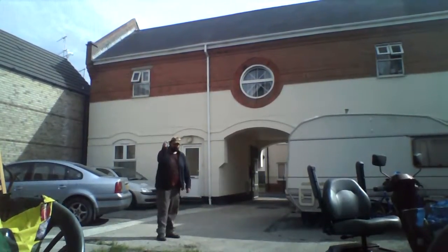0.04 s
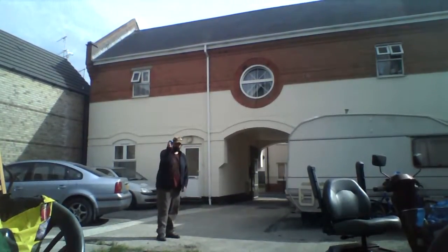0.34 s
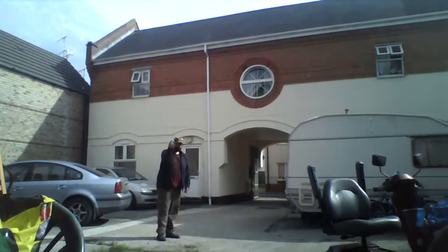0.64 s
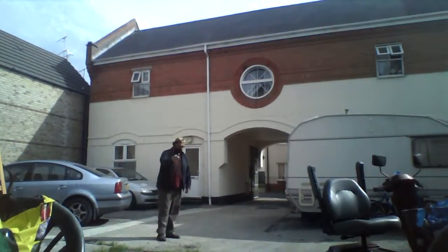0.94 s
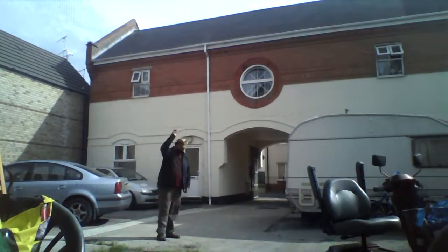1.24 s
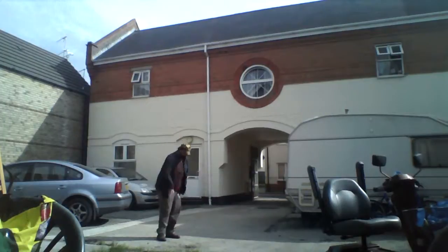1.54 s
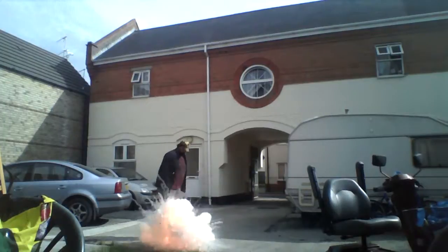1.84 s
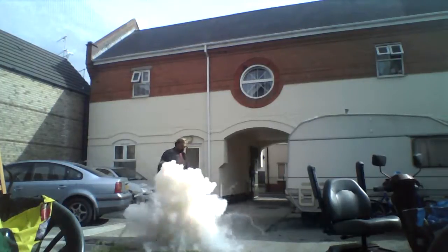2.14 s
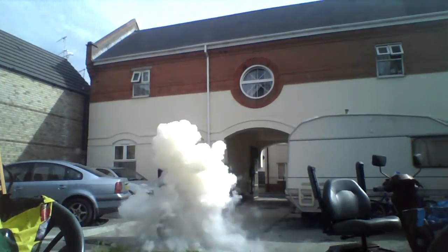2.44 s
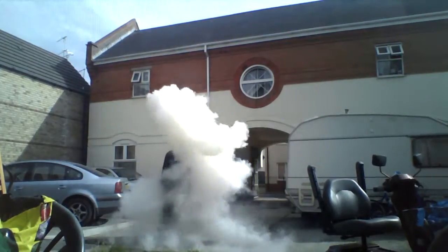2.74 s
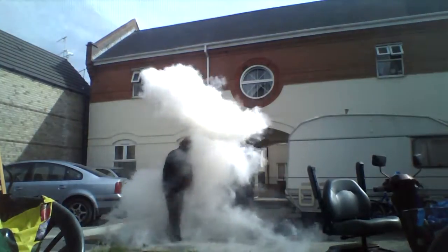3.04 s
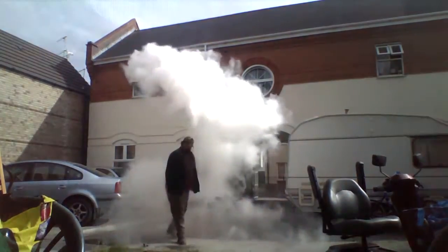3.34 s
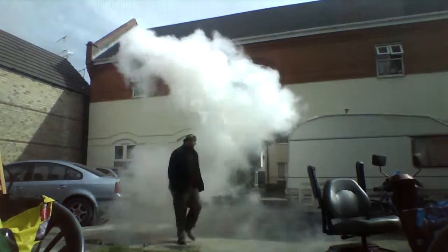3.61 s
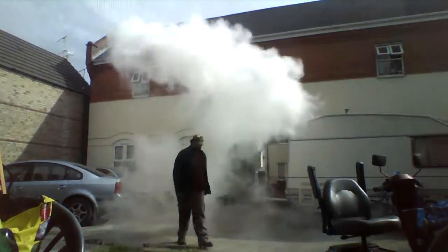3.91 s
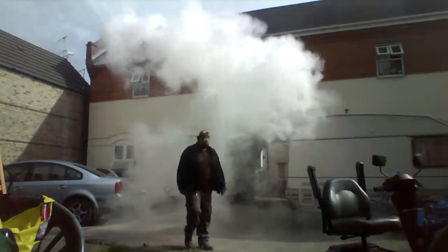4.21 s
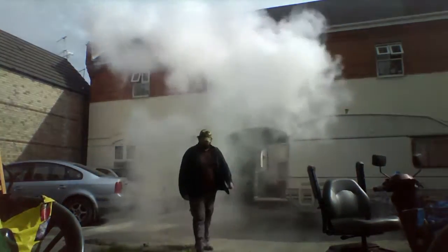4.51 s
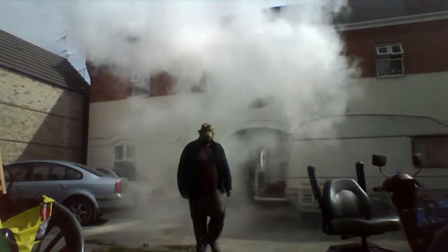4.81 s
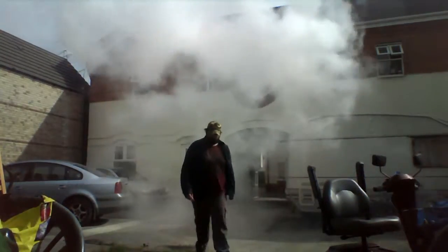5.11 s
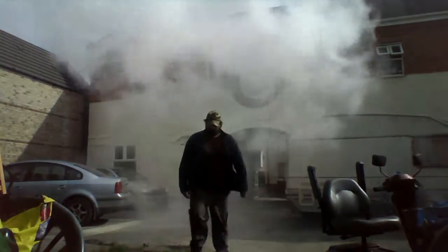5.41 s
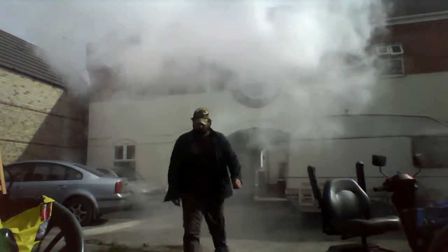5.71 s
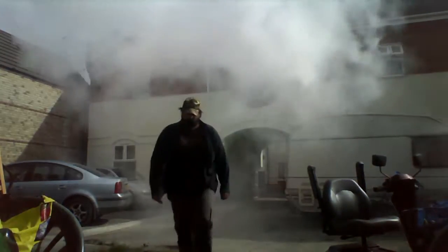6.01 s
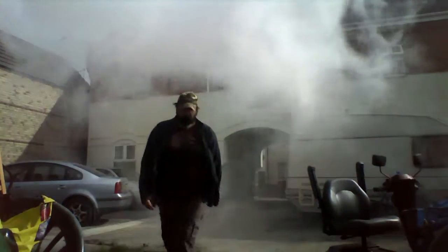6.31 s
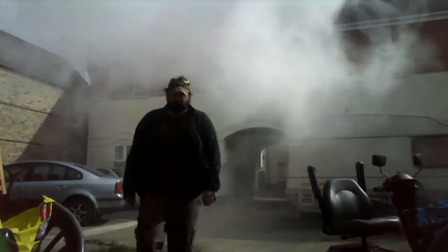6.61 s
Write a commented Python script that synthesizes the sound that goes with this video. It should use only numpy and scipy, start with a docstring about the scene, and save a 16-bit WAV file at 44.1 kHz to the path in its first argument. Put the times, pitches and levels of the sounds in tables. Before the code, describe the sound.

In a walled courtyard with faint distant traffic, a few quick ticks and a very short fizz lead into the sharp, slightly distorted bang of a smoke bomb. A loud, sizzling rush of gas follows and sputters out in under a second. Then a low thump of wind hits the small mono microphone nearby. Lighter puffs of air come later, and a shoe scuffs quietly once near the end.

```python
"""A smoke bomb, thrown down in a walled courtyard a few metres from a small mono camera.
It ticks on the paving, fizzes alight and bursts; the bang overloads the microphone and rings
between the walls. Gas from the burning powder rushes out with a hiss, a roar and a last rasp.
A puff of air then thumps on the microphone; lighter gusts touch it before and later.
A shoe scuffs once, over a faint town hum."""
import sys
import numpy as np
from scipy import signal
from scipy.fft import rfft, irfft, next_fast_len
from scipy.io import wavfile
from scipy.ndimage import uniform_filter1d, map_coordinates

SR = 44100
rng = np.random.default_rng(int(sys.argv[2]) if len(sys.argv) > 2 else 0)


def dump(signal):
    """Clip the signal to [-1, 1] and save it as 16-bit WAV at the path in sys.argv[1]."""
    limited = np.clip(np.atleast_2d(signal).T, -1, 1)
    pcm = np.round(limited * 32767).astype(np.int16)
    wavfile.write(sys.argv[1], SR, pcm)


N = 297675
BANG_S = 1.7494

# echoes off ground, cars and walls: delay/s, level/dB
REFLECTIONS = [(.0057, -9.5), (.0108, -21), (.0154, -11.5), (.0185, -13.5), (0.022, -9.5), (.0808, -15),
               (.1215, -18), (.135, -13), (.222, -22)]


def amp(db):
    """Decibels to gain."""
    return 10 ** (np.asarray(db) / 20)


def unit(x):
    """Scale to rms 1."""
    return x / np.sqrt(np.mean(x ** 2) + 1e-20)


def along(points, hz):
    """Interpolate (f/Hz, value) points over log frequency."""
    f, v = np.transpose(points)
    return np.interp(np.log(hz + 1), np.log(f + 1), v)


def clock():
    """Sample times in s."""
    return np.arange(N) / SR


def fade(start_s, end_s):
    """Ramp from 0 at start_s to 1 at end_s."""
    return np.clip((clock() - start_s) / (end_s - start_s), 0, 1)


def peaked(peak_s, rise_db_s, fall_db_s):
    """Level in dB: climbs to 0 at peak_s, then falls; slopes in dB/s."""
    t = clock()
    return np.minimum(rise_db_s * (t - peak_s), fall_db_s * (peak_s - t))


def wobble(rate_hz):
    """Smooth random curve, rate_hz knots a second."""
    return map_coordinates(rng.standard_normal(int(N * rate_hz / SR) + 4), [clock() * rate_hz])


def filtered(x, response):
    """Apply the frequency response response(hz)."""
    size = next_fast_len(N + SR // 2)
    return irfft(rfft(x, size) * response(np.fft.rfftfreq(size, 1 / SR)), size)[:N]


def coloured(x, spectrum):
    """Shape x by a (f/Hz, level/dB) spectrum; rms 1."""
    return unit(filtered(x, lambda hz: amp(along(spectrum, hz))))


def noise(spectrum):
    """Coloured Gaussian noise, rms 1."""
    return coloured(rng.standard_normal(N), spectrum)


def pulse(spectrum, size=2048):
    """Minimum-phase pulse with this spectrum, peak 1."""
    cepstrum = irfft(np.log(amp(along(spectrum, np.fft.rfftfreq(size, 1 / SR)))))
    cepstrum[1:size // 2] *= 2
    cepstrum[size // 2 + 1:] = 0
    shape = irfft(np.exp(rfft(cepstrum)))
    return shape / np.abs(shape).max()


def town():
    """Distant traffic and the wavering hum of a far engine drawing near."""
    # traffic noise spectrum: f/Hz, level/dB
    traffic_spectrum = [(50, -24), (97, -29.5), (125, -3.5), (175, -2.5), (245, -5.5), (370, -6.5),
                        (500, -8.5), (720, -9), (1220, -13.5), (1950, -17), (3000, -22.5), (7500, -27)]
    # engine orders: f/Hz, level/dB
    orders = [(181, 0), (314, -6.5), (375, -15), (680, -11.5), (775, -8.5), (860, -13)]
    hum = 0
    for hz, db in orders:
        gain = amp(db + 2.4 * wobble(5.6))
        wavering_hz = hz * (1 + .012 * wobble(13))
        hum += gain * np.sin(2 * np.pi * np.cumsum(wavering_hz) / SR)
    traffic_db = -59 + 0.02 * clock() + 0.17 * wobble(4.9)
    return amp(traffic_db) * noise(traffic_spectrum) + amp(-82.5 + 3 * clock()) * hum


def scuff():
    """A shoe grinds briefly on gritty paving."""
    # grit spectrum: f/Hz, level/dB
    grit = [(1000, -12), (2200, -7), (2600, -7), (3100, -2), (3700, -8), (4200, -17), (7500, -27)]
    return amp(-58 + peaked(5.738, rise_db_s=3000, fall_db_s=1100)) * noise(grit)


def eddy(peak_s, db, hz, half_length_s):
    """One eddy briefly swings the pressure at the microphone."""
    t = clock() - peak_s
    bell = np.exp(1 - np.sqrt(1 + 3 * (t / half_length_s) ** 2))
    return amp(db) * bell * np.cos(2 * np.pi * hz * t)


def buffets():
    """Air on the microphone: a thump, its flutter and single light puffs."""
    # eddies, the two loudest form the thump: t/s, level/dB, f/Hz, half length/s
    puffs = [(0.016, -19, 229, 0.0024), (0.031, -30.5, 180, 0.005), (0.057, -32, 175, .009),
             (.24, -52, 163, .008), (2.53, -47.5, 152, .03), (2.583, -27, 174, 0.007),
             (2.604, -32, 352, .003), (2.62, -20, 179, 0.007), (2.6362, -5, 388.4, 0.0015),
             (2.644, -4.5, 191, 0.0045), (2.654, -24, 330, .002), (2.665, -15.5, 160.1, 0.01),
             (2.697, -14, 205.3, 0.0035), (2.714, -19.5, 199, .0035), (2.733, -20.5, 160, 0.0054),
             (2.746, -26.5, 260, .003), (2.7565, -22.5, 175, 0.005), (2.773, -26.5, 135, 0.014),
             (2.806, -36, 195, 0.0055), (2.872, -34, 180, 0.0043), (2.938, -44.5, 165, .004),
             (2.953, -39, 185, 0.004), (2.968, -44, 150, .008), (3.409, -51, 168, 0.0088),
             (4.117, -54, 159, 0.0062), (4.478, -39.5, 140, 0.01), (4.577, -45.5, 142, 0.0093),
             (6.538, -44, 218, 0.0047), (6.563, -50, 133, 0.022)]
    pressure = sum(eddy(*puff) for puff in puffs)
    # finer turbulence rides on the gust
    swirl = noise([(100, -18), (170, 7), (350, 2), (550, -15), (900, -26), (2000, -70)])
    pressure += amp(-36.5) * swirl * fade(2.59, 2.64) * fade(2.79, 2.74)
    mic_low_cut = [(30, -19.5), (70, -17.5), (95, -21), (122, 1.5)]  # f/Hz, gain/dB
    return filtered(pressure, lambda hz: amp(along(mic_low_cut, hz)))


def courtyard(hz):
    """Gain of the standing waves between the walls."""
    # courtyard modes: f/Hz, width/Hz, level/dB
    modes = [(135, 34, 7.5), (213.5, 21, 8.5), (280, 49, 2), (457, 23, 6.5), (565.7, 18, 2.5),
             (706, 26, 3.5), (785, 13, -3.5), (883, 81, 2), (1020, 47, 4), (1306, 30, -0.5), (1590, 57, 0),
             (1716, 26, -2), (2040, 32, 0.5)]
    power = sum(amp(db) ** 2 / (1 + (2 * (hz - mode_hz) / width_hz) ** 2) ** 2
                for mode_hz, width_hz, db in modes)
    return np.sqrt(1 + power)


def ticks():
    """Sharp ticks as the bomb meets the paving and catches."""
    # contacts: t/s, level/dB, T60/s
    contacts = [(1.6355, -37, .02), (1.674, -38, .03), (1.683, -34, .02), (1.694, -21, .009),
                (1.703, -36, .02), (1.72, -31, .025)]
    t = clock()
    envelope = sum((t > s) * amp(db - 9 - 60 * np.abs(t - s) / t60_s) for s, db, t60_s in contacts)
    return envelope * noise([(200, -10.5), (900, 14.5), (1800, -10.5), (3200, -2),
                             (4200, -9.5), (5100, 1.5), (6100, -9), (7000, -1.5)])


def sparks(rate_hz, spread_db):
    """Burning grains: tiny pops of uneven size at random times, rms 1."""
    pops = (rng.random(N) < rate_hz / SR) * rng.standard_normal(N)
    return unit(pops * amp(spread_db * rng.standard_normal(N)))


def ignition():
    """The powder catches, fizzes louder, flares and is blown out by the bang."""
    # fizz spectrum: f/Hz, level/dB
    fizz_spectrum = [(100, -12), (300, -2.5), (850, 2.5), (2200, -9.5), (3000, -11), (4000, -7),
                     (6200, -9.5), (7500, -21)]
    flare_s, growth_db_s = 1.73, 290.5
    growth_db = growth_db_s * (BANG_S - flare_s) + peaked(BANG_S, growth_db_s, fall_db_s=1401)
    flare_db = 12 * fade(flare_s, flare_s + .008)
    fizz = coloured(rng.standard_normal(N) + .9 * sparks(rate_hz=600, spread_db=2), fizz_spectrum)
    return amp(-42.5 + growth_db + flare_db) * fizz


def rumble():
    """The billowing cloud rumbles faintly below the rush."""
    # rumble spectrum: f/Hz, level/dB
    spectrum = [(25, -10), (55, -2.5), (95, 0.5), (140, -20), (300, -59.5)]
    return amp(-61.5 + peaked(1.93, rise_db_s=129.5, fall_db_s=137.5)) * noise(spectrum)


def turbulence(x, depth_db):
    """Patches of random gain, a few hundred Hz by tens of ms; rms 1."""
    bins = signal.stft(x, nperseg=512)[2]
    patches = uniform_filter1d(rng.standard_normal(bins.shape), size=3, axis=0)
    patches = uniform_filter1d(patches, size=9, axis=1)
    return unit(signal.istft(bins * amp(depth_db * unit(patches)), nperseg=512)[1][:N])


def burn_levels():
    """Hiss, roar and rasp in dB: a first jet, then the bulk of the powder swells, sputters, is spent."""
    # last lumps of powder sputtering: t/s, level change/dB
    sputters = [(2.07, 0.5), (2.2, 1.5), (2.295, 1), (2.382, -2), (2.455, 0), (2.495, -3.5)]
    t = clock()
    jet = amp(-23.5 - 55 * np.abs(t - BANG_S))
    swell = amp(-24.5 + peaked(2.016, rise_db_s=50.5, fall_db_s=43))
    sputter_db = sum(db * np.exp(-((t - s) / 0.023) ** 2) for s, db in sputters)
    hiss_db = 20 * np.log10(np.hypot(jet, swell)) + .4 * sputter_db
    roar_db = -25.5 + peaked(1.964, rise_db_s=2, fall_db_s=45) + sputter_db
    rasp_db = -44 + peaked(2.39, rise_db_s=39, fall_db_s=28.5)
    spent_db = 9 * fade(2.483, 2.533)
    return hiss_db - spent_db, roar_db - spent_db, rasp_db - spent_db


def burn():
    """Gas rushes from the burning powder, mirrored by the ground and near walls."""
    # sizzling hiss: f/Hz, level/dB
    hiss_spectrum = [(900, -28), (1500, -13.5), (1950, -3), (2450, -2.5), (3100, -3.5), (3800, -1),
                     (4500, -4.5), (5200, -3.5), (5800, -6.5), (6700, -4), (7500, -7.5)]
    # billowing roar: f/Hz, level/dB
    roar_spectrum = [(110, -21.5), (170, -10.5), (260, -5.5), (480, -4), (560, -9), (700, -2.5), (1000, -1),
                     (1400, 1), (2000, -1.5), (2500, -8), (3300, -9), (4400, -23.5), (7000, -45)]
    # last gas rasping from the emptying case: f/Hz, level/dB
    rasp_spectrum = [(500, -18.5), (800, -8.5), (960, 6.5), (1130, -7), (1400, -1.5), (1750, -4),
                     (2100, 1.5), (2350, -13), (3500, -26), (4500, -14.5), (5000, -5.5), (5700, -9.5),
                     (7500, -11.5)]
    hiss_db, roar_db, rasp_db = burn_levels()
    sizzle = rng.standard_normal(N) + 0.5 * sparks(rate_hz=2500, spread_db=-0.5)
    hiss = turbulence(coloured(sizzle, hiss_spectrum), depth_db=1.5)
    roar = turbulence(filtered(noise(roar_spectrum), courtyard), depth_db=1.5)
    rasp = turbulence(noise(rasp_spectrum), depth_db=5)
    hiss *= amp(hiss_db + 0.33 * wobble(27))
    roar *= amp(roar_db + 0.55 * wobble(45))
    rush = (hiss + roar + amp(rasp_db) * rasp) * fade(1.75, 1.778)
    paving = (0.000983, -17.5)  # delay/s, level/dB
    paths = [paving] + [(delay_s, db - 10) for delay_s, db in REFLECTIONS[:5]]
    return filtered(rush, lambda hz: 1 + sum(amp(db) * np.exp(-2j * np.pi * hz * s) for s, db in paths))


def crack():
    """Tearing edge of the burst: a flash of bright noise just behind the shock."""
    edge = noise([(700, -12.5), (1500, 5), (2400, 1), (3200, 4.5), (4100, 2.5), (4800, -8.5),
                  (7500, -18)])
    return amp(-17.5 + peaked(1.7535, rise_db_s=6000, fall_db_s=1700)) * edge


def ring():
    """Reverberation builds as the walls answer the bang; each frequency dies at its own rate."""
    # courtyard decay: f/Hz, T60/s
    decay_times = [(130, 0.92), (220, 0.71), (500, 0.5), (1000, 0.45), (3000, .9), (8000, .4)]
    hz, frame_s, bins = signal.stft(rng.standard_normal(N), SR, nperseg=512)
    decay_db = -60 * np.maximum(frame_s - BANG_S, 0) / along(decay_times, hz)[:, None]
    tail = signal.istft(bins * amp(decay_db), SR, nperseg=512)[1][:N]
    return amp(-31) * filtered(tail, courtyard) * fade(BANG_S, BANG_S + 0.115)


def bang():
    """The burst's shock pulse with hard echoes, scatter off near clutter and the courtyard's ring."""
    # shock pulse spectrum: f/Hz, level/dB
    blast = [(60, -17), (130, -4.5), (220, 5), (350, -1), (480, 2.5), (700, 3.5), (1000, 2), (1500, -7),
             (2400, -19.5), (4000, -29.5), (5000, -41), (7500, -47)]
    shock_hz, allpass_hz, scatter_t60_s = 3000, 1300, 0.27
    paths = np.zeros(N)
    for delay_s, db in [(.0008, 2.5)] + REFLECTIONS:
        paths[round((BANG_S + delay_s) * SR)] += amp(db)
    # powder burns rather than detonates: rounded front
    paths = filtered(paths, lambda hz: np.exp(-(hz / shock_hz) ** 2))
    age_s = np.maximum(clock() - BANG_S, 0)
    scatter = amp(-30 - 60 * age_s / scatter_t60_s) * rng.standard_normal(N)
    diffuse = scatter * fade(BANG_S, BANG_S + 0.0065) + ring()
    boom = amp(6.5) * signal.fftconvolve(paths + diffuse, pulse(blast))[:N]
    # bass lags treble
    return filtered(boom, lambda hz: (allpass_hz - 1j * hz) / (allpass_hz + 1j * hz))


def scene():
    """All sources at one small microphone that passes little bass."""
    airborne = ignition() + bang() + crack() + burn() + ticks() + scuff()
    low_cut = signal.ellip(5, 1, 32, 120, "highpass", fs=SR, output="sos")
    airborne = signal.sosfilt(low_cut, airborne)
    return np.tile(airborne + rumble() + buffets() + town(), (2, 1))


def record(dry):
    """Narrow-band mono recorder: clips at full scale, adds faint hiss, blocks the slowest swings."""
    band_hz, top_hz, bass_hz = 7490, 15750, 55
    sound = filtered(dry[0], lambda hz: 1 / np.sqrt(1 + (hz / band_hz) ** 130))
    sound = np.clip(sound, -1, 1) + amp(-77) * rng.standard_normal(N)
    sound = filtered(sound, lambda hz: (hz < top_hz) * 1j * hz / (bass_hz + 1j * hz))
    return np.tile(sound, (2, 1))


dry = scene()
out = record(dry)
dump(out)
```